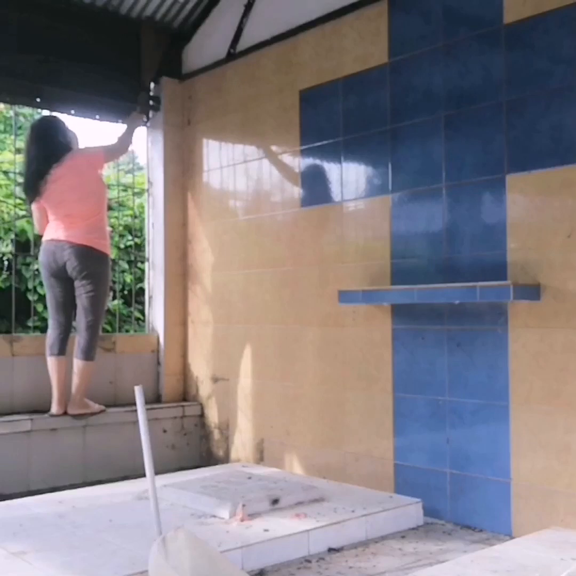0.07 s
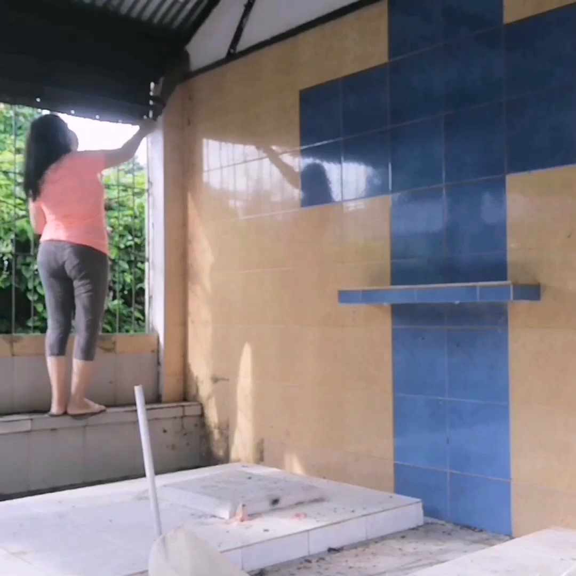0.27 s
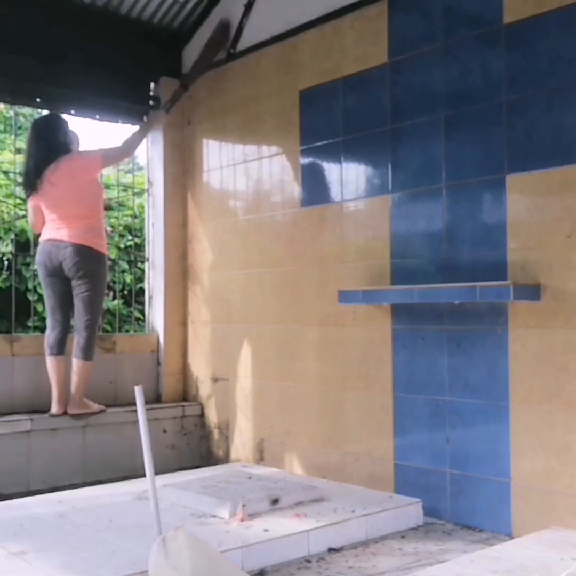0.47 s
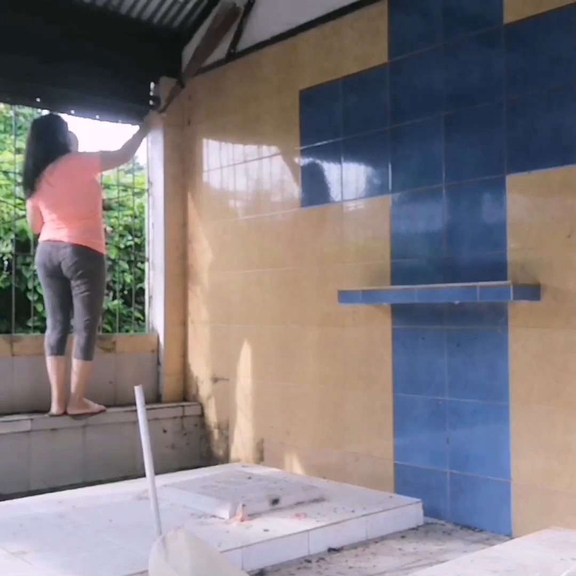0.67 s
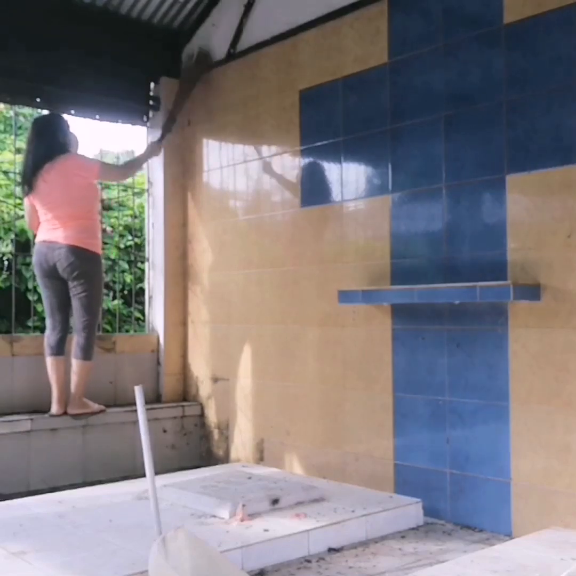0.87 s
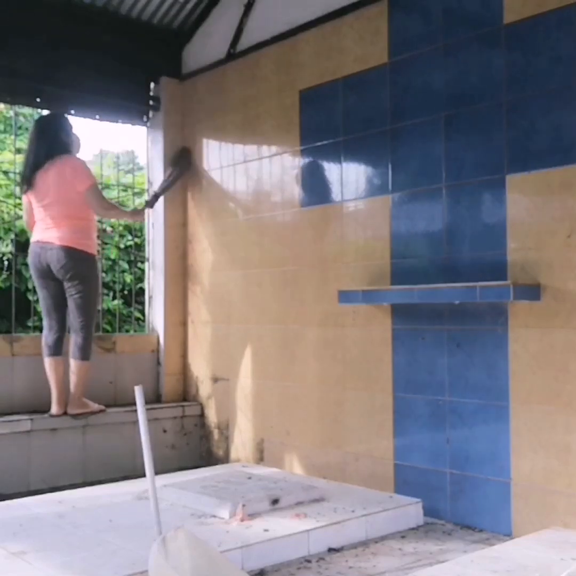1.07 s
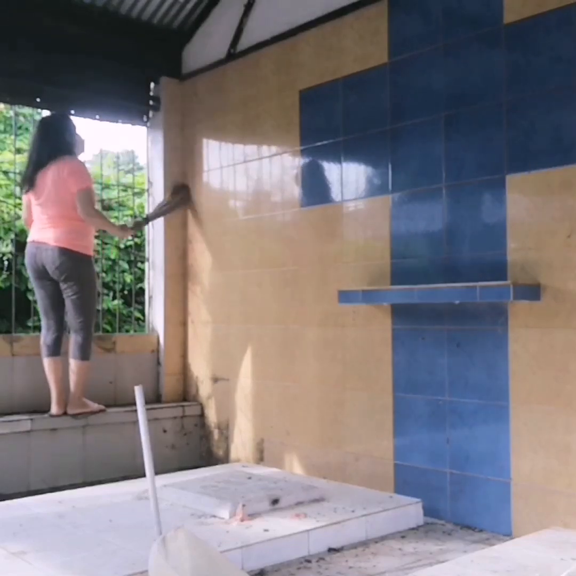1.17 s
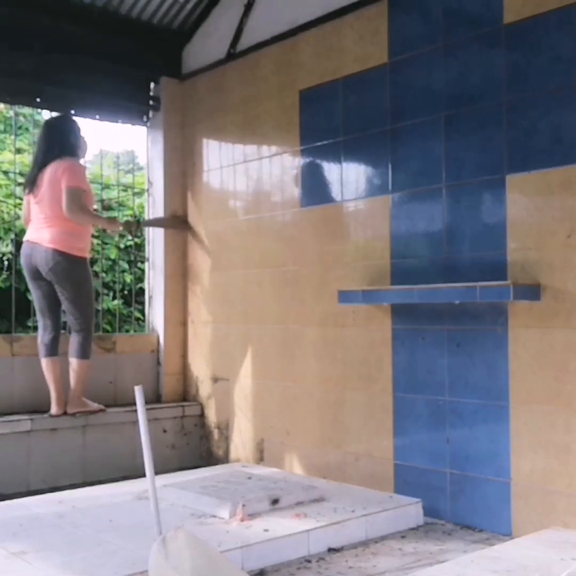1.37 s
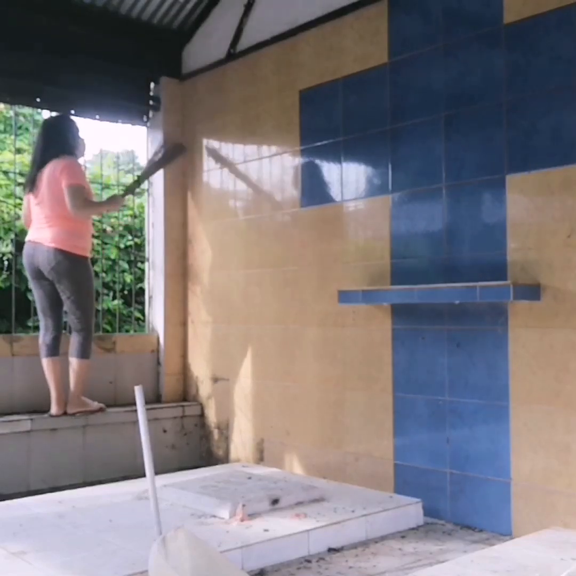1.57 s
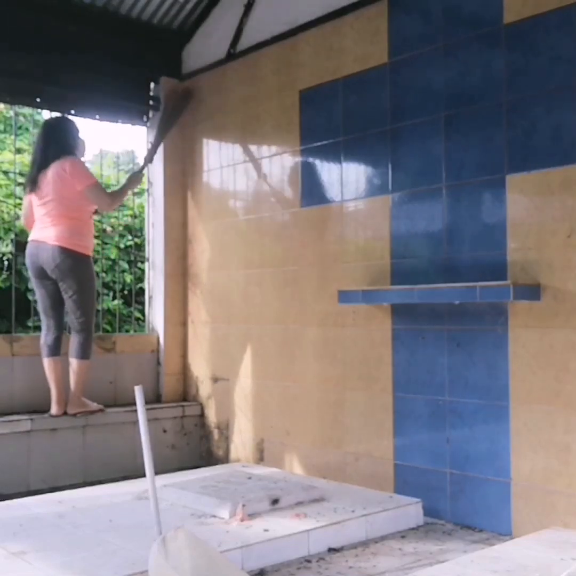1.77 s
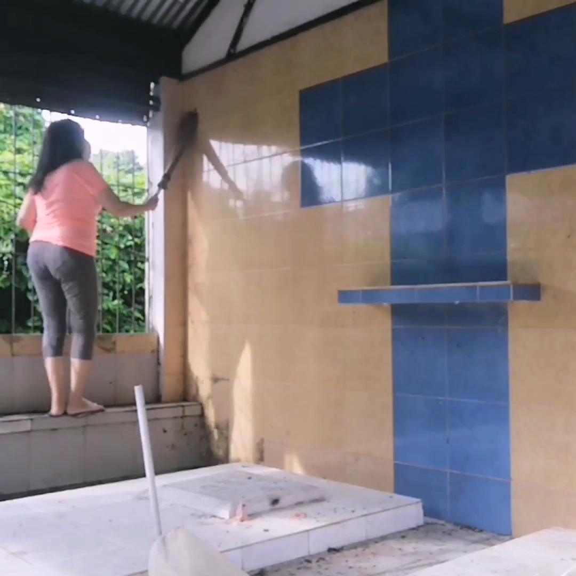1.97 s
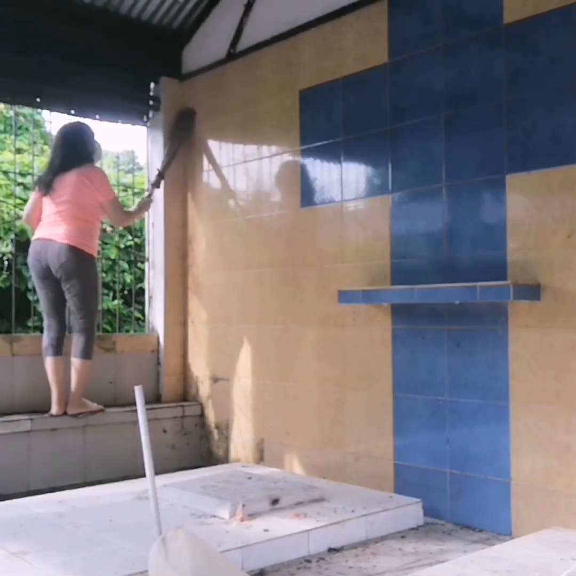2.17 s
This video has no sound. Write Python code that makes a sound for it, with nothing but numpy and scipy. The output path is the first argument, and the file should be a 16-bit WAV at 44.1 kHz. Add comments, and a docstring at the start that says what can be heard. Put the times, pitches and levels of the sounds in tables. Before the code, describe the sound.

A stiff reed broom scrapes wood in an open tiled shelter. A faint scratch opens; from 0.25 to 0.6 s a long drag rasps with woody knocks and a low roof boom. A brighter, loudest scrape peaks near 0.9 s, a slapping swipe hits at 1.2 s, then weak brushing fades over quiet outdoor air, with faint distant tones after 1.75 s and a light scratch returning around 2.2 s.

```python
"""An open tiled shelter, a phone's microphones a few metres from a stiff reed broom.
The broom is dragged along a roof beam, a rafter and a post. Bristle tips scratch as dense filtered clicks;
pressed stems bump along and drive the resonances of what they rub, and some pushes make single tones swell.
A booming roof sheet is resonant noise; outdoor air, a faint hum, far tones and a brief whirr lie below."""
import sys
import numpy as np
from scipy import signal
from scipy.fft import rfft, irfft
from scipy.io import wavfile
from scipy.ndimage import uniform_filter1d

SR = 44100
rng = np.random.default_rng(int(sys.argv[2]) if len(sys.argv) > 2 else 0)


def linear_from_db(decibels):
    """Turn decibels (scalar or array-like) into linear amplitude factors; 0 gives 1."""
    return 10 ** (np.asarray(decibels, float) / 20)


def persist_wave(psi):
    """Save psi, clipped to +-1, as 16-bit WAV."""
    counts = np.round(np.clip(psi, -1, 1) * 32767).astype(np.int16)
    wavfile.write(sys.argv[1], SR, np.atleast_2d(counts).T)


N = 98343


def unit(x):
    """Scale to rms 1."""
    return x / np.sqrt(np.mean(x ** 2) + 1e-18)


def over_hz(table):
    """Read a (frequency [Hz], value) table at every spectral bin, along log frequency."""
    table = np.array(table)
    hz = np.fft.rfftfreq(N, 1 / SR)
    return np.interp(np.log(hz + 1), np.log(table[:, 0] + 1), table[:, 1])


def over_time(table, axis=1, closed=False):
    """Read a column of a time table at every sample; closed gives -120 dB outside the table."""
    table = np.array(table)
    end = -120 if closed else None
    return np.interp(np.arange(N) / SR, table[:, 0], table[:, axis], end, end)


def shaped(x, gain):
    """Filter by a gain for each spectral bin."""
    return irfft(rfft(x) * gain, N)


def ring(x, modes):
    """Drive a sum of two-pole resonances (frequency [Hz], width [Hz], peak gain [dB])."""
    f = np.fft.rfftfreq(N, 1 / SR)
    gain = sum(linear_from_db(db) * 1j * f * w / (hz ** 2 - f ** 2 + 1j * f * w) for hz, w, db in modes)
    return shaped(x, gain)


def tilted(x, hz, db):
    """Lean the sound about hz: treble up by db and bass down by as much."""
    low = signal.sosfilt(signal.butter(2, hz, fs=SR, output="sos"), x)
    return low * linear_from_db(-db) + (x - low) * linear_from_db(db)


def walk(rate):
    """Smoothed noise of spread 1; rate [1/s] sets how fast it wanders."""
    k = max(int(SR / rate), 1)
    smooth = uniform_filter1d(rng.standard_normal(N), k)
    return unit(uniform_filter1d(smooth, k))


def noise():
    """White noise, three unrelated draws: shared, left, right."""
    return rng.standard_normal((3, N))


def clicks(rate, spread_db):
    """Scattered slips of uneven size and random sign, three unrelated draws (shared, left, right)."""
    chance = rng.random((3, N)) < rate / SR
    sign = rng.choice([-1, 1], (3, N))
    size = linear_from_db(spread_db * np.clip(rng.standard_normal((3, N)), -2, 2))
    return unit(chance * sign * size)


def rings(rows):
    """Unsteady sines rise over a quarter-sine swell, then decay exponentially."""
    pitch_waver, rough_db = .009, 2.4
    t, out = np.arange(N) / SR, 0
    for start, hz, db, swell, t60 in rows:
        age = np.maximum(t - start, 0)
        rise = np.sin(np.pi / 2 * np.minimum(age / swell, 1))
        fall = np.exp(-np.log(1000) * np.maximum(age - swell, 0) / t60)
        turns = np.cumsum(hz * (1 + pitch_waver * walk(27.6))) / SR
        phase = 2 * np.pi * (turns + 0.45 * rng.random((3, 1)))  # the three draws start apart
        level = np.sqrt(2) * linear_from_db(db + rough_db * walk(44))
        out = out + level * rise * fall * np.sin(phase)
    return out


# Colour of the outdoor air around the shelter: (frequency [Hz], relative level per Hz [dB])
AIR_COLOUR = [(12, -36), (20, 0), (64, -1.5), (118, 3), (156, -12), (231, -5.5), (272, -15), (449, -14),
              (828, -15), (951, -13.5), (1290, -23), (2250, -21), (15300, -51)]


def outdoor_air():
    """Air noise is white noise given the outdoor spectrum, its level wavering slightly."""
    level_db = -61 + 0.71 * walk(12)
    return unit(shaped(noise(), linear_from_db(over_hz(AIR_COLOUR)))) * linear_from_db(level_db)


def hum():
    """A faint hum is one sine, wavering in pitch and level, alike at both microphones."""
    mean_hz, level_db = 156.5, -63.5
    waver_db, wavers_per_s = 1.5, 14
    turns = np.cumsum(mean_hz * (1 + 0.009 * walk(7.1))) / SR
    return np.sqrt(2) * np.sin(2 * np.pi * turns) * linear_from_db(level_db + waver_db * walk(wavers_per_s))


def whirr():
    """A brief, faint high whirr is noise through the same resonance twice, swelling and fading."""
    start_s, length_s, level_db = 2.01, .17, -71
    band = [(5150, 1100, 0)]
    steady = unit(ring(ring(noise(), band), band)) * linear_from_db(level_db)
    t = np.arange(N) / SR
    return steady * np.sin(np.pi * np.clip((t - start_s) / length_s, 0, 1))


# Faint tones far off: (start [s], frequency [Hz], level [dB], swell [s], 60 dB decay [s])
DISTANT_TONES = [(1.75, 915, -77, .05, .3), (1.88, 925, -75, .03, .2), (1.95, 920, -76, .03, .2),
                 (2.08, 945, -74, .03, .15), (2.17, 1120, -76, .03, .2)]


def far_tones():
    """Far tones are wavering sines that swell and die away."""
    return rings(DISTANT_TONES)


# Roof sheet under the first drag: (time [s], level [dB])
BOOM_LEVEL = [(0.2, -90), (0.264, -39.5), (0.404, -36.5), (0.44, -54), (0.494, -40.5), (0.556, -77),
              (0.625, -48.5), (0.764, -76), (0.8, -72)]
# Roof sheet resonances: (frequency [Hz], width [Hz], peak gain [dB])
SHEET_MODES = [(93, 37, -1), (105, 38, -2)]


def boom():
    """The roof sheet booms while the broom pushes on the beam: noise through low resonances."""
    return unit(ring(noise(), SHEET_MODES)) * linear_from_db(over_time(BOOM_LEVEL, closed=True))


# Resonances a push catches: (start [s], frequency [Hz], level [dB], swell [s], 60 dB decay [s])
CAUGHT_RESONANCES = [(.155, 285, -54, 0.046, 0.11), (.182, 360, -48, 0.028, 0.11),
                     (.255, 316.4, -44.5, 0.024, 0.18), (.255, 655, -50.5, 0.017, 0.64),
                     (.275, 435, -41, 0.026, 0.053), (.34, 3180, -39, 0.035, 0.26),
                     (.31, 235.7, -47, 0.053, 0.24), (.87, 715, -49, 0.038, 0.26),
                     (.88, 505, -49, 0.046, 0.15), (.96, 580, -58, 0.04, 0.11),
                     (.86, 1340, -46, 0.067, 0.15), (.87, 1740, -45, 0.04, 0.29),
                     (1.215, 560, -43, 0.057, 0.13), (1.23, 1624, -52, 0.017, 0.24),
                     (1.36, 556, -56.5, 0.0095, 0.12), (1.33, 1604, -60, 0.025, 0.47),
                     (1.36, 247, -59.5, 0.043, 0.83), (1.37, 810, -65, 0.022, 0.22)]


def caught_rings():
    """A push catches one resonance: it swells, then rings out."""
    return rings(CAUGHT_RESONANCES)


# Stems pressed on beam, rafter and post, one list each: (time [s], push level [dB], brightness lean [dB])
STEM_PRESSURE = [
    [(0.0, -55, 7), (0.008, -49.5, 0.5), (0.158, -57.5, 3), (0.2, -56, -11.5), (0.236, -54.5, -13),
     (0.262, -33.5, -2.5), (0.51, -40, 2), (0.732, -61.5, -2.5), (0.78, -69, 12)],
    [(0.835, -62, 8), (0.85, -52.5, 6.5), (0.906, -37.5, 2), (0.982, -43.5, -0.6), (1.182, -49, -2),
     (1.21, -70, -12)],
    [(1.2, -72, 7), (1.214, -62, -8), (1.24, -44.5, -0.5), (1.276, -44.5, 2.2), (1.352, -57.5, 4),
     (1.364, -54.5, -4.5), (1.41, -62, 0.5), (1.526, -68, -3), (1.536, -80, -11), (1.61, -77, -2),
     (1.62, -83, 11)],
]
# Resonances of the rubbed timbers: (frequency [Hz], width [Hz], peak gain [dB])
BEAM_MODES = [(256, 17, 5), (332, 64, -0.5), (450, 390, -2), (640, 210, -3.5), (810, 83, -10),
              (920, 150, -0.5), (1160, 250, 0.5), (1760, 150, -7), (2600, 46, 1.5), (2860, 69, -3.5),
              (3160, 56, -8)]
RAFTER_MODES = [(316, 190, -4.5), (505, 39, -2), (580, 20, -4), (715, 40, -17), (830, 160, -7),
                (1340, 140, -9), (1600, 120, 0.5), (2020, 110, -18)]
POST_MODES = [(285, 41, 0.5), (408, 100, -1), (468, 32, -7), (560, 70, 3.5), (810, 39, -10.5),
              (1230, 190, -10)]


def stems():
    """Pressed stems bump along, setting each rubbed thing ringing; its brightness follows the press."""
    bumps_per_s, bump_spread_db = 2500, 1.5
    body = [(690, 6100, -17)]  # broad knock under the resonances
    tilt_hz, low_cut_hz = 840, 174
    out = 0
    for press, timber in zip(STEM_PRESSURE, (BEAM_MODES, RAFTER_MODES, POST_MODES)):
        bumps = clicks(bumps_per_s, bump_spread_db)
        modes = timber + body
        pushed = bumps * linear_from_db(over_time(press, closed=True))
        rung = ring(pushed, modes) / np.std(ring(bumps, modes))
        out = out + tilted(rung, tilt_hz, over_time(press, axis=2))
    return signal.sosfilt(signal.butter(3, low_cut_hz, "high", fs=SR, output="sos"), out)


def reeds(x):
    """Single reeds are narrow resonances driven by the scratching, each coming and going."""
    count, low_hz, high_hz = 36, 1000, 14000
    width = 0.013  # share of the pitch
    level_db, flicker_db = -10.5, 8
    pitches = np.geomspace(low_hz, high_hz, count) * (1 + 0.0307 * rng.standard_normal(count))
    out = 0
    for hz in pitches:
        sung = signal.lfilter(*signal.iirpeak(hz, 1 / width, fs=SR), x)
        out = out + sung * linear_from_db(level_db + flicker_db * walk(10.6))
    return out


# Bristle tips on the wood: (time [s], level [dB], treble against the whole [dB])
TIP_STROKES = [(0.0, -47, -6), (0.12, -49.5, -5.5), (0.175, -66, -6), (0.232, -67, -13.5), (0.25, -50, -6),
               (0.31, -34.5, -6.5), (0.345, -38, -6.5), (0.36, -34.5, -6), (0.45, -34, -6.5),
               (0.485, -38.5, -6.5), (0.55, -34.5, -4.5), (0.6, -41.5, -5.5), (0.69, -51, -1.5),
               (0.75, -37.5, -2.5), (0.86, -29.5, -3.5), (1.06, -45, -5), (1.16, -47.5, -5.5),
               (1.207, -55, -5), (1.217, -33.5, -3), (1.33, -40, -3.5), (1.445, -61, -1.5),
               (1.47, -51.5, -2.5), (1.672, -57, -4), (1.74, -52.5, -4), (1.84, -61, -3.5), (1.87, -55, -3),
               (1.97, -72.5, -4), (2.2, -68, -8.5), (2.23, -46, -0.5)]
# Colour of the scratching before the reeds join: (frequency [Hz], relative level per Hz [dB])
SCRATCH_COLOUR = [(500, -51), (900, -15.5), (1300, -7.5), (1700, -3.5), (2300, -1.5), (3200, -3.5),
                  (5500, -4), (7600, -6.5), (8400, -9.5), (9450, -3), (11000, -7.5), (13000, -10.5),
                  (15200, -10)]
# Tips landing together: (time [s], extra level [dB], fade to 1/e [s])
TIP_SLAPS = [(1.221, 2.5, 0.027), (0.91, -2.5, 0.021), (2.1, 3.5, 0.017)]


def tips():
    """Bristle tips tick over the surface as dense clicks; thin tips sound brighter, thick stems duller."""
    clicks_per_s, click_spread_db, patchy_db = 28000, 2.5, .7
    tilt_hz, usual_treble_db = 6100, -4.5
    t = np.arange(N) / SR
    scratch = unit(shaped(clicks(clicks_per_s, click_spread_db), linear_from_db(over_hz(SCRATCH_COLOUR))))
    scratch = unit(scratch + reeds(scratch))
    slap_db = sum(db * (t > s) * np.exp(-np.abs(t - s) / fade) for s, db, fade in TIP_SLAPS)
    level_db = over_time(TIP_STROKES) + slap_db + patchy_db * walk(49)
    lean_db = over_time(TIP_STROKES, axis=2) - usual_treble_db
    return tilted(scratch, tilt_hz, lean_db) * linear_from_db(level_db)


def shelter_echo(broom):
    """The shelter's echo is a decaying noise tail starting 6 ms after the direct sound."""
    t60_s, level_db = 0.79, -15
    t = np.arange(SR // 2) / SR
    tail = rng.standard_normal(len(t)) * np.exp(-np.log(1000) * t / t60_s) * (t > .006)
    tail = tail / np.sqrt(np.sum(tail ** 2))
    return linear_from_db(level_db) * signal.fftconvolve(broom, tail[None], axes=1)[:, :N]


# Power the two microphones share: (frequency [Hz], share [0-1])
SHARED_POWER = [(60, 0.88), (130, 0.86), (290, 0.82), (640, 0.68), (1400, 0.16), (3080, -0.04),
                (6780, -0.05), (14900, -0.0)]
# Left microphone over right: (frequency [Hz], level difference [dB])
LEFT_OVER_RIGHT = [(60, -4.0), (110, -5.0), (200, -5.5), (380, -6.0), (700, -5.0), (1280, -3.5),
                   (2370, -3.5), (4370, -4.5), (7000, -7.5), (10000, -7.5), (13000, -3.5)]


def microphones(sound, humming):
    """Two microphones agree in the bass and differ in the treble; shared sound reaches the left later."""
    left_lag_s = .0001
    shared, left, right = sound
    like = np.clip(over_hz(SHARED_POWER), 0, 1)
    common, own = np.sqrt(like), np.sqrt(1 - like)
    lean_db = over_hz(LEFT_OVER_RIGHT) / 2
    lag = np.exp(-2j * np.pi * np.fft.rfftfreq(N, 1 / SR) * left_lag_s)
    channels = []
    for side, gain, delay in ((left, linear_from_db(lean_db), lag), (right, linear_from_db(-lean_db), 1)):
        heard = shaped(shared, common * gain * delay) + shaped(side, own * gain)
        channels.append(heard + shaped(humming, gain))
    return np.array(channels)


def scene():
    """The broom and its echo in the shelter, over the outdoor background, at two microphones."""
    background = outdoor_air() + far_tones() + whirr()
    broom = boom() + caught_rings() + stems() + tips()
    return microphones(broom + shelter_echo(broom) + background, hum())


def low_pass(x):
    """Removes everything above the highest recorded frequency."""
    return signal.sosfilt(signal.butter(12, 15500, fs=SR, output="sos"), x)


def record(dry):
    """The phone turns loud passages down, the bass further, and cuts the top."""
    follow_s, top_hz = 0.011, 15200
    knee_db, ratio = -41, 1.108
    bass_hz, bass_knee_db, bass_ratio = 173, -44.5, 2.55  # acts on top of the overall turning down
    keep = np.exp(-1 / (follow_s * SR))
    power = signal.lfilter([1 - keep], [1, -keep], np.mean(dry ** 2, axis=0))
    loudness = np.sqrt(power + 1e-18)
    held = dry * np.minimum(linear_from_db(knee_db) / loudness, 1) ** (1 - 1 / ratio)
    bass = signal.sosfiltfilt(signal.butter(2, bass_hz, fs=SR, output="sos"), held)
    bass_gain = np.minimum(linear_from_db(bass_knee_db) / loudness, 1) ** (1 - 1 / bass_ratio)
    held = held - bass * (1 - bass_gain)
    mix = signal.sosfilt(signal.ellip(12, .2, 70, top_hz, fs=SR, output="sos"), held)
    return low_pass(mix)


dry = scene()
out = record(dry)
persist_wave(out)
```